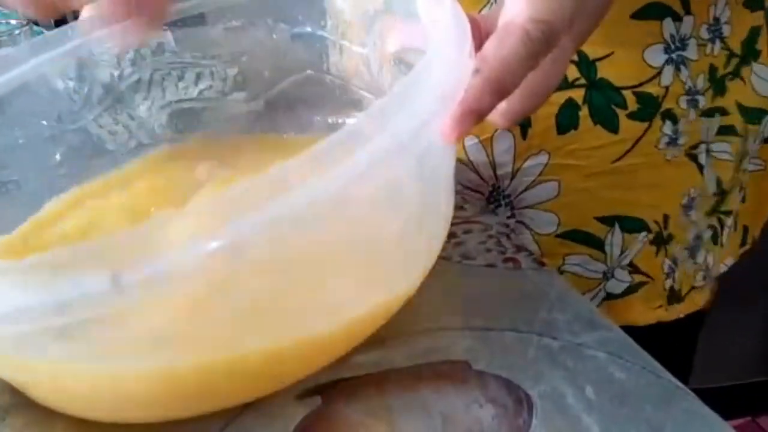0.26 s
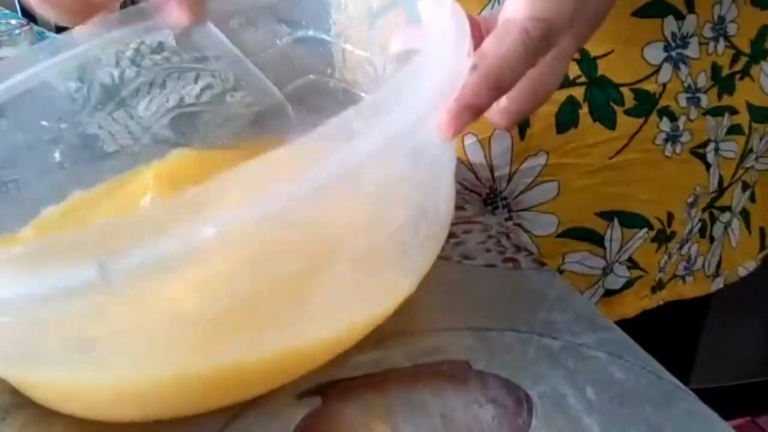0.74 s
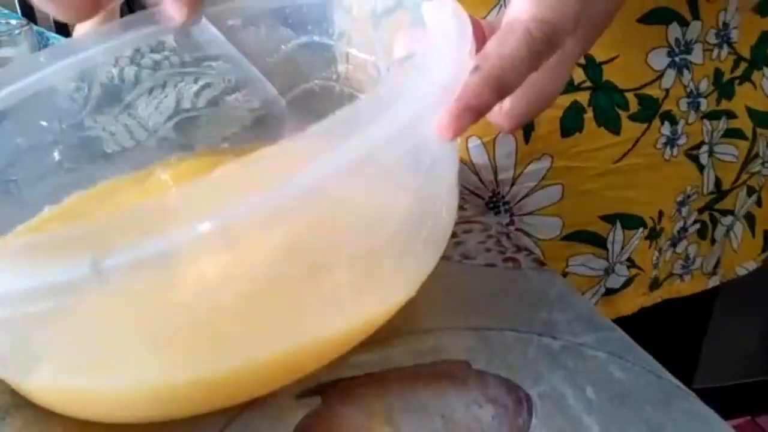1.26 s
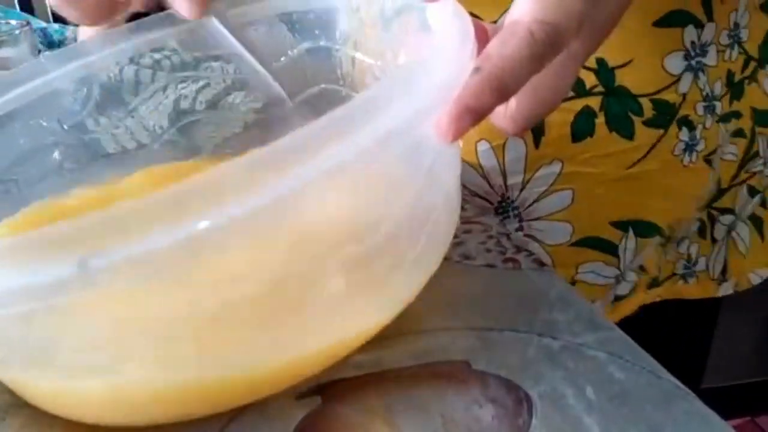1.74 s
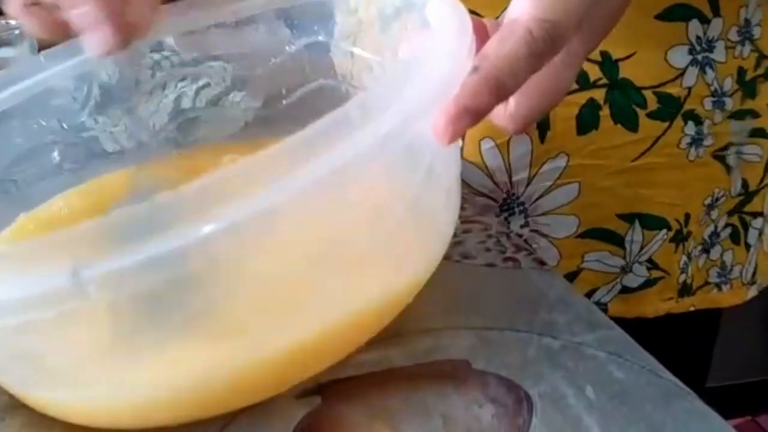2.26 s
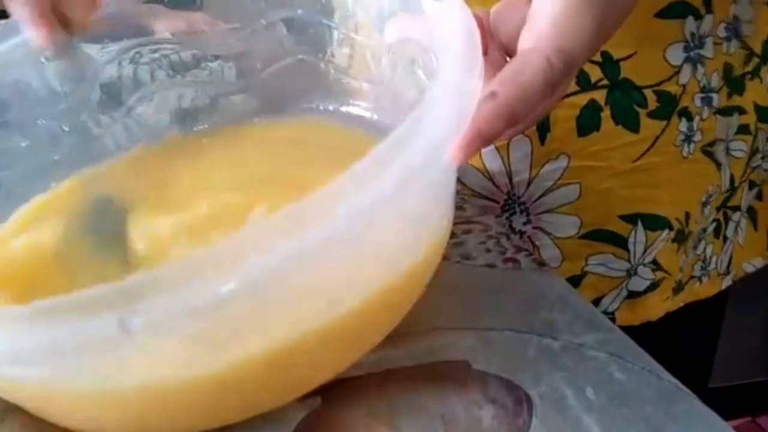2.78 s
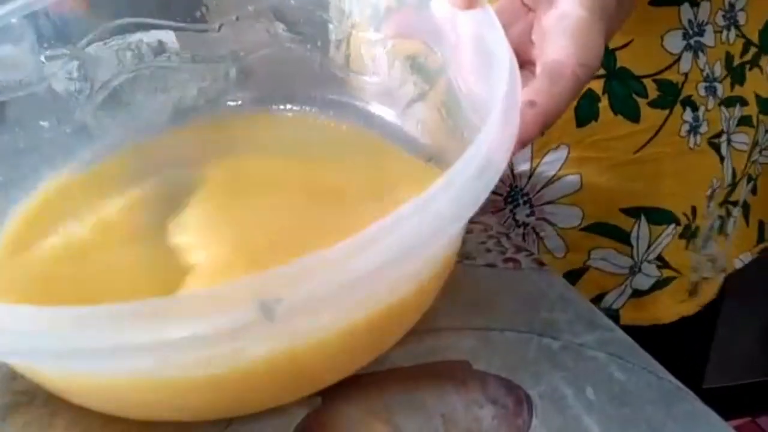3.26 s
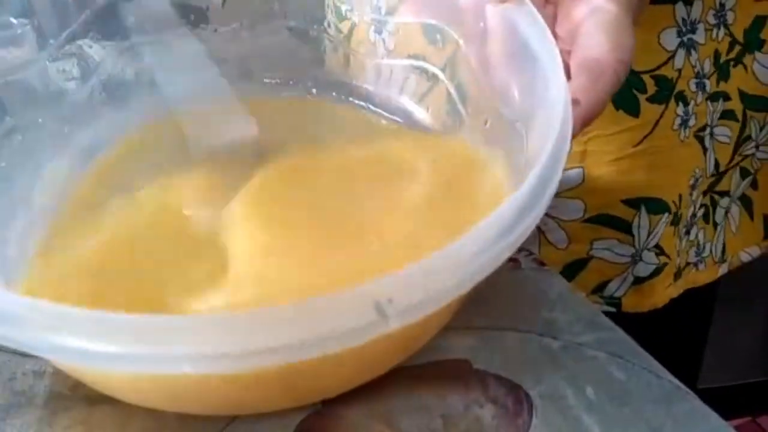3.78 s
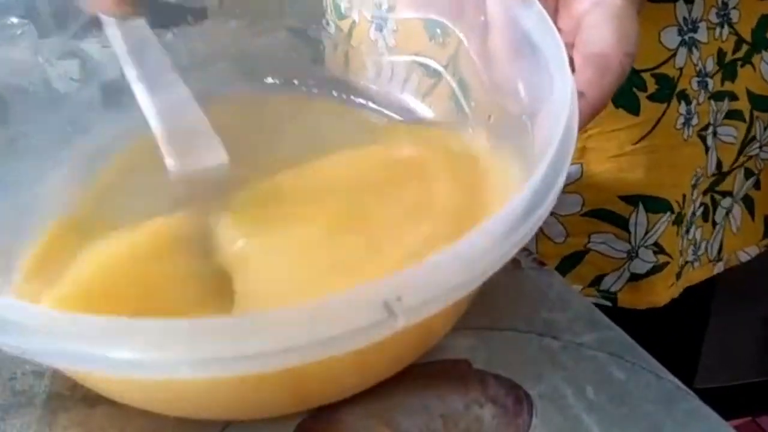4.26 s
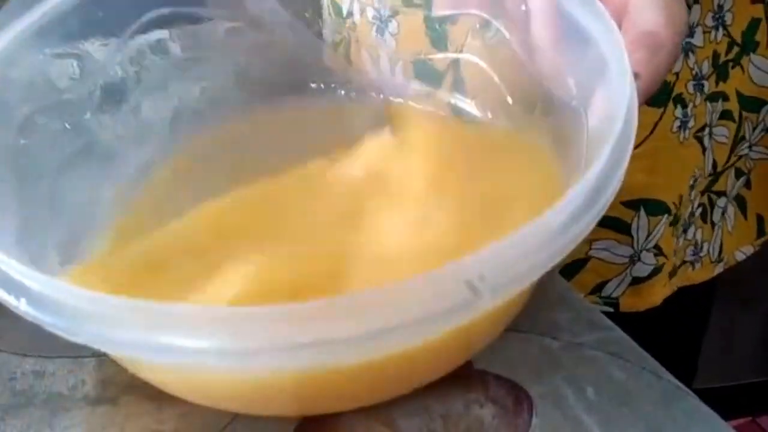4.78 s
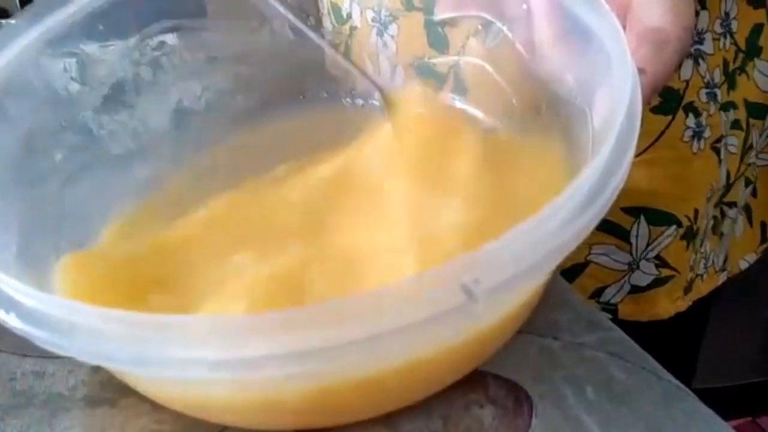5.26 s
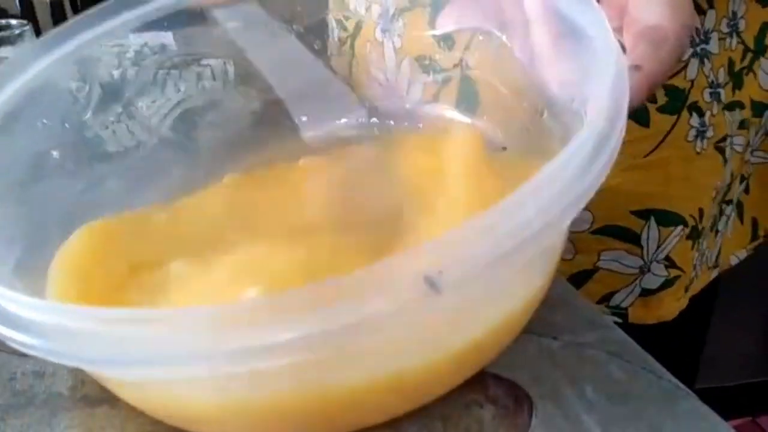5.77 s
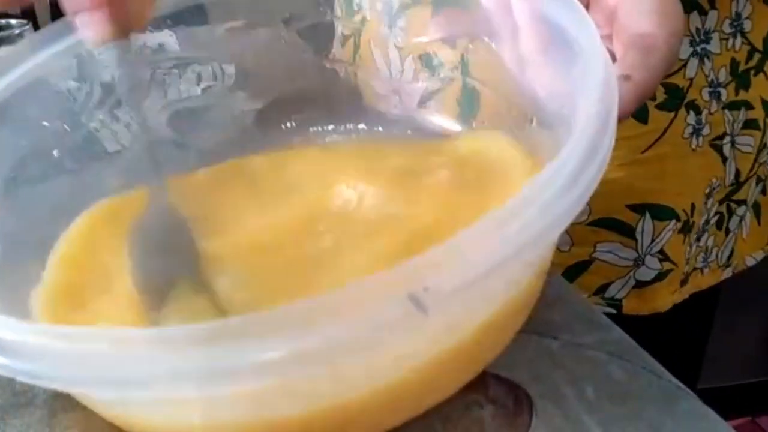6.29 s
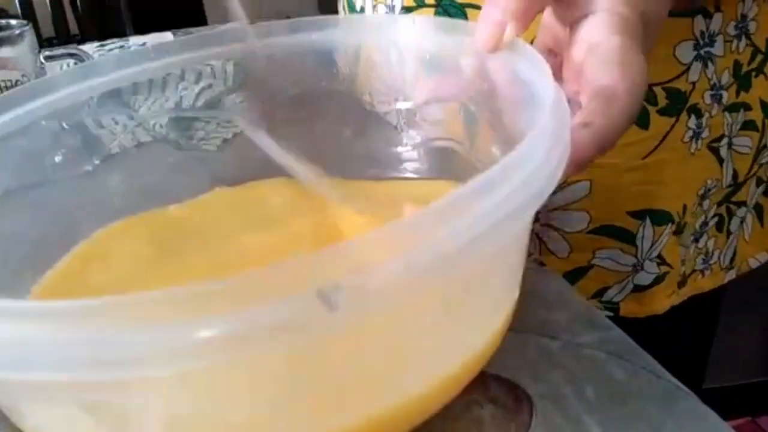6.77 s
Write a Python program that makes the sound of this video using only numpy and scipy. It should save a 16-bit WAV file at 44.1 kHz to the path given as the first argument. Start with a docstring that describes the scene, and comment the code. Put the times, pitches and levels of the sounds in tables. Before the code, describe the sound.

A metal fork briskly beats egg in a plastic bowl, about four clacking strokes a second, with wet slaps, bubble pops and low air rumble.

```python
"""In a small kitchen, a fork beats eggs and oil in a hand-held plastic bowl, about four strokes a second.
Each stroke knocks the tines on the wall and drags them along it: noise forces ring modes of fork and bowl.
Between strokes the egg slaps back, sloshes and froths, and its air pockets pop as damped, rising sines.
The swinging arm fans air over one microphone port, a low lumpy rumble of coloured noise on the left.
Dense reflections off hard walls and a faint room tone surround it all."""
import sys
import numpy as np
from scipy import signal
from scipy.fft import rfft, irfft, next_fast_len
from scipy.io import wavfile
from scipy.ndimage import uniform_filter1d

SR = 44100
rng = np.random.default_rng(int(sys.argv[2]) if len(sys.argv) > 2 else 0)


def wav_record(signal):
    """Record a signal, one row per channel, as 16-bit PCM in the file named by sys.argv[1]."""
    frames = np.transpose(np.atleast_2d(signal))
    bounded = np.clip(frames, -1, 1)
    # unit amplitude maps onto the largest positive 16-bit level
    quanta = np.round(bounded * 32767).astype(np.int16)
    wavfile.write(sys.argv[1], SR, quanta)


N = 310023
HIT_SIZE = 4096  # samples in one hit, drag or pop
LAST_LIFT_S = 6.69  # frothing and small bubbles end here

# faint room tone: (frequency [Hz], relative density [dB per Hz])
ROOM_TONE = [(200, 0), (2000, -17), (5000, -30), (8000, -15), (11000, -36)]

# the mass of egg turning over: (time [s], slosh level [dB])
CHURN = [(0, -48), (2, -45.5), (4.87, -56), (4.94, -25), (5.03, -29.5), (5.18, -51.5), (7.03, -55.5)]
# hollows of the sloshing egg: (frequency [Hz], width [Hz], relative level [dB])
SLOSH_MODES = [(230, 50, 2), (340, 60, -2), (500, 100, -10), (720, 200, -16)]
FROTH_DB = -51

# air stirred by the arm, at the exposed port before eddies: (time [s], rumble level [dB])
DRAUGHT = [(0.0, -26), (0.18, -22.5), (0.29, -37), (0.36, -17), (0.65, -43.5), (0.79, -17.5), (0.94, -33.5),
           (1.19, -15), (1.26, -36.5), (1.64, -29.5), (1.78, -38), (1.94, -17), (2.68, -40.5), (3.28, -27),
           (3.91, -31), (4.01, -14.5), (4.16, -31.5), (4.41, -28.5), (4.63, -41), (4.75, -26.5),
           (5.52, -32), (5.76, -20), (6.21, -34), (6.32, -23.5), (6.37, -26.5), (7.02, -20.5)]
# single short buffets of air: (time [s], peak level [dB])
BUFFETS = [(0.965, -26.5), (2.826, -18.5), (2.94, -14.5), (3.543, -19.5), (4.059, -17.5), (5.36, -21.5),
           (5.684, -15), (6.695, -19.5), (6.9, -13.5)]
BUFFET_S = 0.018  # from the peak until its power has fallen to 1/e
# air buffeting a port: (frequency [Hz], relative density [dB per Hz])
WIND_SPECTRUM = [(25, -45), (42, -19.5), (60, -4.5), (80, 4.5), (120, 3), (170, -2), (240, -8.5),
                 (330, -14.5), (500, -31), (2500, -72)]
SHELTERED_PORT_DB = -45  # steady rumble of the right port's own
# eddies make the draught lumpy: deepest lull, highest swell, spacing
LULL_DB, SWELL_DB, EDDY_S = -11, 2.5, 0.045

# fork strokes: (time [s], strength of the blow [dB], pressure of the scrape [dB])
STROKES = [(0.0191, 0.5, 0), (0.2594, 0.5, -2.5), (0.5009, 0, -4), (0.7273, 0.5, -3.5), (0.952, 0.5, -4),
           (1.1842, -1, -1), (1.4256, -1.5, -4), (1.6677, -0.5, -3), (1.9094, -1, -2.5), (2.138, -1, -5.5),
           (2.3635, -2.5, -4.5), (2.5881, -2.5, -2.5), (2.8298, -1, -2.5), (3.0765, 2, -3.5),
           (3.3284, -1.5, -6.5), (3.556, 1, -1.5), (3.7986, -2.5, 0), (4.063, -3, -4.5), (4.299, 0.5, 1.5),
           (4.5289, -2, -4.5), (4.7562, -0.5, -4), (4.9833, -0.5, 1), (5.217, -2.5, -3), (5.4547, -0.5, -5),
           (5.6885, 0, -3), (5.9201, 2, -4), (6.1622, -1, -1), (6.3951, -1.5, -2), (6.6245, -3, 1)]
# an average stroke: tick of the tines, knock of the wall, scrape under full pressure
TICK_DB, KNOCK_DB, SCRAPE_DB = -21.5, -23, -33.5
# modes of the fork: (frequency [Hz], width [Hz], relative level [dB])
TINE_MODES = [(3920, 1240, -12.5), (5683, 1650, -2.5), (6200, 1660, -2.5), (7900, 600, -1),
              (9110, 560, -10.5), (10090, 400, -9), (11700, 960, -15.5), (13000, 1700, -20),
              (15200, 1400, -24)]
# modes of the bowl wall: (frequency [Hz], width [Hz], relative level [dB])
WALL_MODES = [(1048, 250, -0.5), (1360, 680, -11.5), (1580, 610, -11), (1947, 199, 6), (2207, 187, 2.5),
              (2390, 310, -1), (2900, 444, -7.5)]
# modes of the bowl's loaded floor: (frequency [Hz], width [Hz], relative level [dB])
FLOOR_MODES = [(218, 51, 3.5), (325, 75, -0.5), (388.5, 72, 1.5), (629, 200, -9), (753, 142, -6.5)]
WALL_HZ = 1930  # knock pitch at which the wall modes ring as listed
KNOCK_HZ = 1933  # main pitch of the wall with egg lying against it
# tipping the bowl bares the wall and frees its lowest modes; set level, its floor thuds:
# (time [s], low wall modes [dB], thud against knock [dB])
TILT = [(0, 3, -9.5), (1.2, -2, -9.5), (1.8, 5.5, -2), (2.6, 5.5, -10.5), (3.4, 0, -9.5), (4.1, -4.5, -0.5),
        (5.5, -5, -0.5), (7, -0.5, -9)]
# broad hiss of a breaking liquid film: (frequency [Hz], width [Hz], relative level [dB])
SPLAT_MODES = [(5200, 1900, 0)]

# trapped air pockets: (time [s], level [dB], starting pitch [Hz])
BUBBLES = [(0.3943, -34.5, 764), (0.5849, -35, 740), (0.8008, -36, 714), (0.869, -31.5, 1464),
           (1.106, -29.5, 1356), (1.568, -32.5, 1550), (1.8071, -30, 766), (2.0333, -29, 1053),
           (2.3426, -31.5, 690), (2.4365, -23.5, 1860), (2.7463, -35.5, 1354), (2.9282, -34, 637),
           (4.3813, -29.5, 762), (4.955, -30, 325), (5.0734, -29, 723), (5.8224, -10.5, 2070)]
# a gentle pop rings this long at this level; a violent one bursts open and dies sooner
POP_T60_S, GENTLE_POP_DB, POP_DAMPING = 0.042, -33, 0.3
SMALL_BUBBLES_DB, DIP_DB = -45, -38  # the strongest small bubble and tick of a dip

# egg slapping back between strokes, a few rows almost only a faint wet tick:
# (time [s], wet snap [dB], knock [dB])
SLAPS = [(0.3489, -23.5, -26), (0.8109, -23, -23.5), (1.0442, -19, -22), (1.794, -39.5, -28),
         (2.247, -31.5, -48), (2.4359, -26.5, -32.5), (3.7344, -29.5, -49), (4.3816, -34.5, -27.5),
         (4.852, -31, -25.5), (5.0725, -38, -25), (5.1331, -31, -45), (5.3118, -27, -22),
         (5.5446, -37, -25.5), (5.7674, -31, -24.5), (6.0124, -34, -28), (6.0567, -31.5, -43.5),
         (6.251, -23, -20.5)]
SLAP_THUD_DB = 2.5  # a slap has more thud under its knock than a fork stroke has
# the fork grazes the side wall in passing: (time [s], knock level [dB], wall pitch [Hz])
GRAZES = [(0.3947, -32, 1470), (0.852, -30, 1770), (1.5679, -33.5, 1800), (2.554, -31, 2600),
          (2.769, -27.5, 1540), (5.1885, -20.5, 1840), (5.3601, -27, 1890), (5.5903, -25.5, 2240),
          (5.829, -18.5, 1880), (6.5322, -33.5, 2180)]
GRAZE_SNAP_DB = -0.5  # snap of the tines against the knock

# kitchen reverberation: (frequency [Hz], gain against the direct sound [dB])
ROOM_GAIN = [(100, -29), (400, -7.5), (1000, -9), (2100, -10.5), (3200, -8.5), (5000, -12), (8000, -11),
             (16000, -14)]
KITCHEN_T60_S = 0.86
# likeness of the two channels: (frequency [Hz], likeness [0-1])
LIKENESS = [(200, 0.91), (2000, 0.3), (4000, 0.13)]
# the ports hear the treble differently: (frequency [Hz], left minus right [dB])
BALANCE_DB = [(5000, 0.5), (7800, 0.5), (8800, 15), (10000, 2), (13000, 2.5)]
CUTOFF_HZ = 16000


def from_db(db):
    """Decibels to gain."""
    return 10 ** (np.asarray(db) / 20)


def rms_one(x):
    """Scale to rms 1."""
    return x / np.sqrt(np.mean(x ** 2) + 1e-20)


def hit_one(x):
    """Scale a hit to the energy of 10 ms at rms 1."""
    return rms_one(x) * np.sqrt(.01 * SR / x.shape[-1])


def in_time(rows):
    """Draw a (time, level) curve through every sample."""
    times, levels = np.transpose(rows)
    return np.interp(np.arange(N) / SR, times, levels)


def at_hz(points, hz):
    """Read a table on a log-frequency axis."""
    f, value = np.transpose(points)
    return np.interp(np.log(hz + 1e-9), np.log(f), value)


def colour(x, spectrum):
    """Give noise a spectrum."""
    size = x.shape[-1]
    padded = next_fast_len(size)
    gain = from_db(at_hz(spectrum, np.fft.rfftfreq(padded, 1 / SR)))
    return irfft(rfft(x, padded) * gain, padded)[..., :size]


def add(out, s, x):
    """Mix a sound in at a time."""
    i = max(round(s * SR), 0)
    out[:, i:i + x.shape[-1]] += x[:, :max(N - i, 0)]


def body(force, modes, stretch=1, scatter_db=0):
    """Two unrelated forces (mid, side) ring parallel modes; high modes reach the two ports less alike."""
    left_right = np.array([[1], [-1]])
    out = 0
    for k, (hz, width, db) in enumerate(modes):
        # a two-pole resonator: a wider mode dies sooner
        radius = np.exp(-np.pi * abs(width) / SR)
        angle = 2 * np.pi * hz * stretch / SR
        poles = [1, -2 * radius * np.cos(angle), radius * radius]
        mid, side = signal.lfilter([1, 0, -1], poles, force + 1e-18)
        alike = np.clip(at_hz(LIKENESS, hz), 0, 1)
        pair = np.sqrt(1 + alike) * rms_one(mid) + np.sqrt(1 - alike) * rms_one(side) * left_right
        level_db = db + scatter_db * rng.standard_normal() + at_hz(BALANCE_DB, hz) / 2 * left_right
        # neighbouring modes alternate in sign
        out = out + (-1) ** k * np.sqrt(abs(width)) * from_db(level_db) * pair
    return rms_one(out)


def grains(size, per_s, spread_db):
    """Random clicks of very uneven size, as a mid and a side force."""
    born = rng.random(size) < per_s / SR
    strength = from_db(spread_db * np.minimum(rng.exponential(1, size), 4))
    return born * strength * rng.standard_normal((2, size))


def lumps(size, depth_db, smooth):
    """Random slow swells and lulls as a gain; smooth is in samples."""
    return from_db(depth_db * rms_one(uniform_filter1d(rng.standard_normal(size), size=smooth)))


def contact(length_s, rise_s):
    """A brief rattle of force, as tines land one after another, cushioned by the egg."""
    t = np.arange(HIT_SIZE) / SR
    return rng.standard_normal((2, HIT_SIZE)) * (1 - np.exp(-t / rise_s)) * np.exp(-t / length_s)


def room_tone(tone_db=-58):
    """Steady coloured noise lies faintly under everything."""
    return from_db(tone_db) * rms_one(colour(rng.standard_normal((2, N)), ROOM_TONE))


def churn(wall_db=-4):
    """The egg sloshes in soft low lumps, and its froth crackles in clumps until the fork stops."""
    slosh = body(grains(N, per_s=900, spread_db=1.5), SLOSH_MODES)
    clumps = lumps(N, depth_db=4, smooth=900)
    beating = np.arange(N) < LAST_LIFT_S * SR
    crackle = grains(N, per_s=14000, spread_db=2) * clumps * beating
    froth = body(crackle, TINE_MODES) + from_db(wall_db) * body(crackle, WALL_MODES)
    return from_db(in_time(CHURN)) * slosh + from_db(FROTH_DB) * rms_one(froth)


def draught(leak_db=-23):
    """Lumpy draught and single buffets hit the left port; the right one lies sheltered."""
    t = np.arange(N) / SR
    eddies_db = np.interp(t / EDDY_S, np.arange(1000), rng.uniform(LULL_DB, SWELL_DB, size=1000))
    power = from_db(in_time(DRAUGHT) + eddies_db) ** 2
    for s, db in BUFFETS:
        power += from_db(db) ** 2 * np.exp(-np.minimum(((t - s) / BUFFET_S) ** 2, 20))
    left, right = colour(rng.standard_normal((2, N)), WIND_SPECTRUM)
    # the rumble is evened out, so that the moving air alone sets its strength
    left = left * np.sqrt(power / (uniform_filter1d(left ** 2, size=1800) + 1e-12))
    return np.array([left, from_db(leak_db) * left + from_db(SHELTERED_PORT_DB) * rms_one(right)])


def bowl(force, s, knock_db, pitch_hz, floor_db=0):
    """The wall knocks at a pitch set by the egg lying against it; the floor thuds more as the bowl is set level."""
    times, bare, level = np.transpose(TILT)
    bare_db, thud_db = np.interp(s, times, bare), np.interp(s, times, level)
    wall = [(hz, width, db + bare_db * (hz < 1450)) for hz, width, db in WALL_MODES]
    knock = hit_one(body(force, wall, pitch_hz / WALL_HZ, scatter_db=3))
    thud = hit_one(body(force, FLOOR_MODES, scatter_db=3))
    return from_db(knock_db) * (knock + from_db(thud_db + floor_db) * thud)


def drag(length_s, rise_s, fall_s, wall_db, wet_db):
    """After landing, the tines stick, skip and slip along the wet wall until the fork lifts out."""
    t = np.arange(HIT_SIZE) / SR
    lift_s = length_s + rng.normal(0, .003)
    release = 1 + np.exp(np.minimum((t - lift_s) / fall_s, 20))
    pressure = (1 - np.exp(-t / rise_s)) / release
    judder = lumps(HIT_SIZE, depth_db=3.2, smooth=200)
    slips = grains(HIT_SIZE, per_s=12000, spread_db=2) * pressure * judder
    wall = from_db(wall_db) * body(slips, WALL_MODES)
    film = from_db(wet_db) * body(slips, SPLAT_MODES)
    return rms_one(body(slips, TINE_MODES) + wall + film) * np.sqrt(np.mean(pressure ** 2))


def fork():
    """Every stroke is a tick of the tines, a knock of the bowl and a short scrape."""
    out = np.zeros((2, N))
    for s, blow_db, press_db in STROKES:
        tick = hit_one(body(contact(length_s=.0018, rise_s=.0005), TINE_MODES))
        pitch_hz = KNOCK_HZ * (1 + rng.normal(0, 0.011))
        blow = contact(length_s=0.0042, rise_s=0.00048)
        scrape = drag(length_s=0.062, rise_s=0.001, fall_s=0.0014, wall_db=-9.5, wet_db=-19)
        add(out, s, from_db(TICK_DB + blow_db) * tick)
        add(out, s, bowl(blow, s, KNOCK_DB + blow_db, pitch_hz))
        add(out, s, from_db(SCRAPE_DB + press_db) * scrape)
    return out


def bubble(hz, t60, rise=.025, onset_s=0.00071, lag_s=.00008, splash_db=-10.0):
    """An air pocket pinches off with a tiny splash, then rings as a damped sine, rising as it nears the surface."""
    t = np.arange(HIT_SIZE) / SR
    pitch = hz * (1 + rise * np.minimum(t / t60, 1))
    # the left port's phase lags a little
    phase = 2 * np.pi * (np.cumsum(pitch) / SR - hz * np.array([[lag_s], [0]]))
    tone = hit_one(np.sin(phase) * from_db(-60 * t / t60) * (1 - np.exp(-t / onset_s)))
    splash = hit_one(body(contact(length_s=.002, rise_s=onset_s), [(hz, hz, 0)]))
    return tone + from_db(splash_db) * splash


def bubbles():
    """A few large pockets gulp and pop; many small ones are folded in as the egg froths."""
    out = np.zeros((2, N))
    for s, db, hz in BUBBLES:
        t60 = POP_T60_S * from_db(POP_DAMPING * (GENTLE_POP_DB - db))
        add(out, s, from_db(db) * bubble(hz, t60))
    for when, size, faintness in rng.random((90, 3)):
        hz = 3000 / 6 ** size  # larger pockets ring lower, from 3000 down to 500 Hz
        level = from_db(SMALL_BUBBLES_DB - 10 * faintness)
        add(out, when * LAST_LIFT_S, level * bubble(hz, 20 / hz))
    return out


def dips():
    """A moment before each stroke but the first, the tines break back into the egg with a few faint wet ticks."""
    out = np.zeros((2, N))
    for s, *_ in STROKES[1:]:
        entry_s = s - rng.uniform(.05, .1)
        for late_s, weaker_db in rng.random((3, 2)) * [.025, 10]:
            force = contact(length_s=.003, rise_s=.002)
            tick = body(force, TINE_MODES) + body(force, SPLAT_MODES) + .5 * body(force, WALL_MODES)
            add(out, entry_s + late_s, from_db(DIP_DB - weaker_db) * hit_one(tick))
    return out


def smack(s, snap_db, knock_db, pitch_hz, floor_db, splat_db=-4):
    """A short wet snap and a knock of the bowl, each at its own level, with no scrape."""
    force = contact(length_s=0.0023, rise_s=0.00014)
    snap = hit_one(body(force, TINE_MODES) + from_db(splat_db) * body(force, SPLAT_MODES))
    blow = contact(length_s=0.0037, rise_s=0.000099)
    return from_db(snap_db) * snap + bowl(blow, s, knock_db, pitch_hz, floor_db)


def slaps():
    """Egg slaps back with a knock and thud; a few rows are faint wet ticks, almost without knock."""
    out = np.zeros((2, N))
    for s, snap_db, knock_db in SLAPS:
        add(out, s, smack(s, snap_db, knock_db, KNOCK_HZ, SLAP_THUD_DB))
    return out


def grazes():
    """The fork clips the side wall, whose pitch depends on the spot; the floor hardly moves."""
    out = np.zeros((2, N))
    for s, db, pitch_hz in GRAZES:
        add(out, s, smack(s, db + GRAZE_SNAP_DB, db, pitch_hz, floor_db=-17))
    return out


def kitchen(x, build_s=0.0013):
    """Dense reflections off hard walls build up and die away, different at each port."""
    t = np.arange(SR) / SR
    tail = rng.standard_normal((2, SR)) * from_db(-60 * t / KITCHEN_T60_S) * (1 - np.exp(-t / build_s))
    tail = colour(rms_one(tail) / np.sqrt(SR), ROOM_GAIN)
    return signal.fftconvolve(x, tail, axes=1)[:, :N]


def scene(bubble_room_db=-9):
    """The bowl in its room, with draught and room tone; bubbles low in the bowl stir the room less."""
    beating = churn() + fork() + dips() + slaps() + grazes()
    pops = bubbles()
    reflections = kitchen(beating + from_db(bubble_room_db) * pops)
    return room_tone() + draught() + beating + pops + reflections


def record(dry):
    """Peaks stop at full scale, then a steep low-pass cuts the top."""
    low_pass = signal.ellip(10, .2, 80, CUTOFF_HZ, fs=SR, output="sos")
    return signal.sosfilt(low_pass, np.clip(dry, -1, 1))


dry = scene()
out = record(dry)
wav_record(out)
```